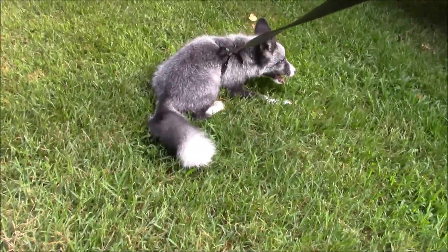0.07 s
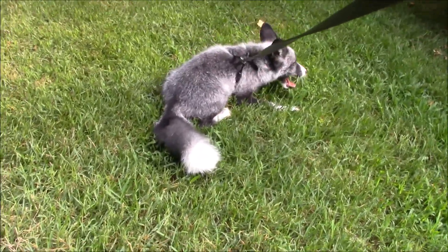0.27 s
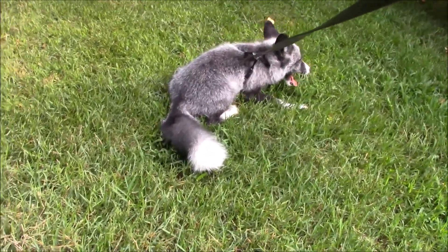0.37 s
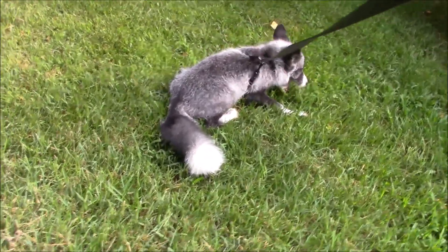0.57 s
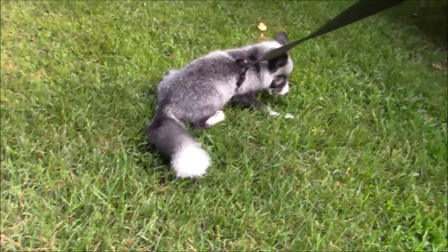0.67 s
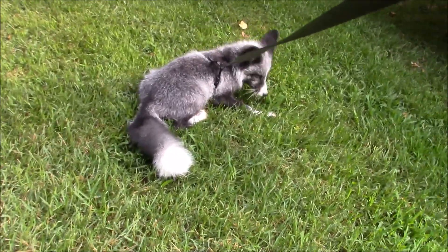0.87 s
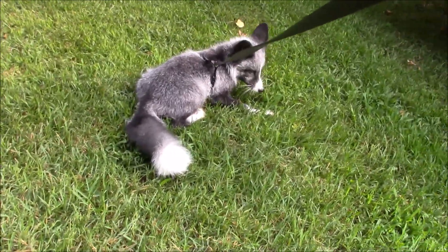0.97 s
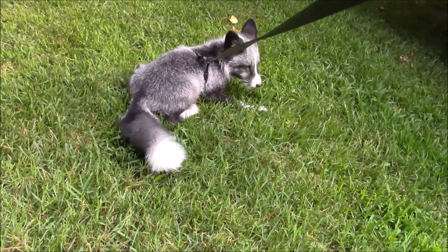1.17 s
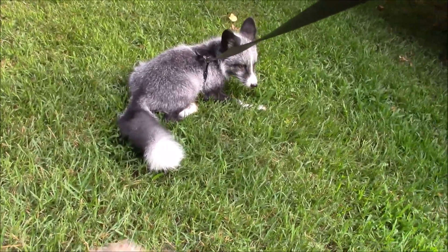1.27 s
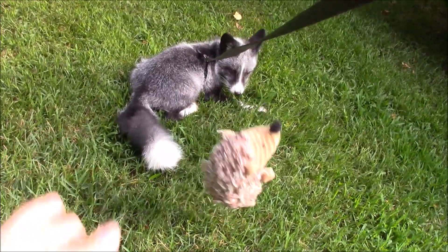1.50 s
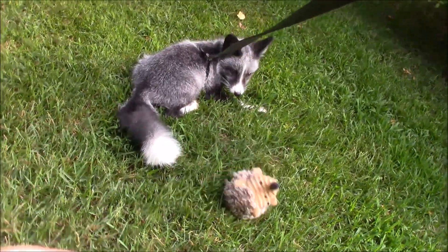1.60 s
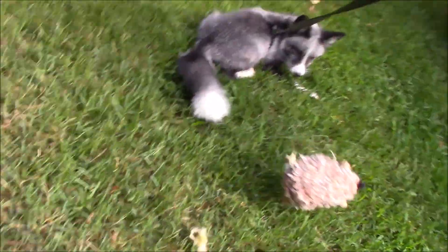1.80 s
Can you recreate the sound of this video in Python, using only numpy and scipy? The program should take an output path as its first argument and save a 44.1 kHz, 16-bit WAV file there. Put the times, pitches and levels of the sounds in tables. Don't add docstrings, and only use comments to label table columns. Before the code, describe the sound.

A squeaky toy, very close, outdoors. A dull brush at 0 s and a faint tick precede nine quick, loud, reedy squeaks from 0.23 to 1.1 s, each arching up and down in pitch, with small bulb ticks between. A softer, flatter, longer squeak follows at 1.17-1.27 s, then a faint whistling air sigh until 1.46 s, a dry snap at 1.43 s, and slight rustles near 1.65 s over low distant traffic.

```python
import sys
import numpy as np
from scipy import signal
from scipy.io import wavfile
from scipy.ndimage import uniform_filter1d

SR = 44100
rng = np.random.default_rng(int(sys.argv[2]) if len(sys.argv) > 2 else 0)


def gain_from_db(level_db):
    decades = np.asarray(level_db, float) / 20
    return 10 ** decades


def wav_out(sig):
    wavfile.write(sys.argv[1], SR, np.round(np.clip(np.atleast_2d(sig).T, -1, 1) * 32767).astype(np.int16))


N = 81585

# time in seconds, pitch in Hz, level in dB.
FIRST_STROKES = [
    [(0.2295, 1113, -10), (0.236, 1191, -7.5), (0.2479, 1277, -9), (0.2574, 1279, -9), (0.2804, 1165, -9.5),
     (0.2923, 1076, -11), (0.2993, 1024, -26), (0.3008, 976, -21.5)],
    [(0.3435, 1099, -13), (0.3564, 1157, -7), (0.3694, 1374, -11), (0.3774, 1322, -9.5),
     (0.3854, 1148, -7.5), (0.3909, 1104, -11), (0.3998, 1112, -9), (0.4083, 923, -26)],
    [(0.465, 1150, -8.5), (0.472, 1250, -7.5), (0.4809, 1334, -6.5), (0.4929, 1368, -7), (0.5044, 1313, -9),
     (0.5154, 1204, -8), (0.5213, 1050, -20.5), (0.5258, 1000, -23.5)],
    [(0.576, 1115, -16), (0.5795, 1070, -14.5), (0.5939, 1200, -6), (0.6019, 1342, -9),
     (0.6064, 1327, -7.5), (0.6159, 1075, -10.5), (0.6234, 1010, -22.5), (0.6288, 903, -23.5)],
]
MIDDLE_STROKES = [
    [(0.66, 1103, -12.5), (0.669, 1196, -8), (0.6849, 1408, -6), (0.6949, 1430, -6), (0.7029, 1408, -7),
     (0.7084, 1160, -12), (0.7139, 1066, -22.5), (0.7173, 1048, -17.5)],
    [(0.7755, 1109, -17.5), (0.789, 1200, -9.5), (0.7939, 1389, -5.5), (0.8019, 1381, -7.5),
     (0.8074, 1296, -7.5), (0.8119, 1077, -13.5), (0.82, 1026, -23), (0.8269, 859, -25.5)],
    [(0.8565, 1108, -13.5), (0.8724, 1282, -8.5), (0.8834, 1379, -3.5), (0.8919, 1392, -8.5),
     (0.8959, 1335, -7.5), (0.8995, 1160, -9.5), (0.9030, 1056, -23.5), (0.9060, 1054, -25),
     (0.9095, 1008, -26)],
    [(0.9665, 1130, -17.5), (0.9785, 1224, -10), (0.9829, 1407, -5.5), (0.9939, 1404, -7),
     (0.9999, 1332, -8.5), (1.0039, 1128, -15.5), (1.014, 1050, -15), (1.0204, 887, -26.5)],
]
LAST_STROKES = [
    [(1.0455, 1097, -16), (1.054, 1201, -13), (1.0674, 1423, -4), (1.0749, 1473, -5), (1.0814, 1482, -5),
     (1.0844, 1346, -6.5), (1.0885, 1097, -19.5), (1.0974, 1020, -22)],
    [(1.1705, 1044, -19.5), (1.1745, 1070, -17), (1.1849, 1079, -14.5), (1.2074, 1075, -14.5),
     (1.2380, 1046, -14), (1.2500, 1044, -17), (1.2580, 1082, -14.5), (1.2663, 944, -24),
     (1.2688, 880, -28.5)],
]
# one reflection notch in Hz, notch spacing in Hz,
# reflection share from 0 to 1, overtone level in dB, overtone change in dB per octave of pitch.
HAND_GRIPS = [(6030, 1230, 0.31, -7.5, 9), (5000, 885, 0.43, -8.5, 1.5), (5030, 1344, 0.5, -7.5, 3.5),
              (6380, 956, 0.64, -10, -9.5), (4872, 1070, 0.71, -8.5, -10.5), (5480, 1345, 0.75, -8, 4),
              (5427, 1176, 0.94, -7, -14), (5577, 1364, 0.81, -8, 11), (6010, 1341, 1, -8, -17.5),
              (5900, 4770, 0.57, -6, -1.5)]
# Hz, level in dB.
SQUEEZE_COLOUR = [(1800, 10), (2700, 1), (3800, -3), (5500, -5), (6800, -12), (8200, -34.5), (11000, -47.5),
                  (16000, -46)]
RELEASE_COLOUR = [(1800, 4), (2700, 2), (3600, -10), (5800, -11.5), (6900, -23.5), (8500, -33.5),
                  (11000, -37.5), (16000, -48)]
OPEN_HAND_COLOUR = [(1800, 4.5), (3200, -9.5), (5400, -7.5), (6500, -22.5), (8000, -24), (10500, -13.5),
                    (12500, -38.5), (16000, -50)]
# time in seconds, peak level in dB, pitch in Hz.
BULB_TICKS = [
    (0.0774, -29.5, 3440),
    (0.317, -22, 1600),
    (.399, -26.5, 590),
    (.562, -37, 1510),
    (.769, -19, 1390),
    (0.959, -21, 1500),
    (1.1614, -19, 1400),
]
# time in seconds, level in dB.
DRY_SNAPS = [
    (1.430, -30),
]
# time in seconds, level in dB, rise in seconds, fall in seconds,
# low edge in Hz.
BRUSHES = [
    (0.0, -37.5, .001, 0.02, 566),
    (.12, -61, 0.39, 0.71, 4330),
    (1.635, -54, 0.01, 0.017, 5000),
    (1.685, -62.5, 0.015, .015, 5900),
    (1.83, -81, .01, 0.0098, 2300),
    (0.0, -47.5, .001, 0.025, 3600),
    (0.0, -31, .001, 0.0064, 300),
    (1.259, -41, .009, .007, 5200),
    (1.275, -66, .01, 0.034, 5000),
]
BRUSH_TOPS_HZ = [3460, 13900, 9900, 10900, 7000, 16100, 2380, 14000, 12300]
# Hz, level in dB per Hz.
TRAFFIC_COLOUR = [(30, -30), (60, -11), (100, 3.5), (300, -8.5), (900, -4), (1900, -15), (3200, -24.5),
                  (16000, -34.5)]
# Hz, likeness from 0 to 1.
LEFT_RIGHT_LIKENESS = [(60, 1), (140, .99), (300, 0.92), (950, 0.99), (3770, .87), (15000, 0.79)]
# pitch in Hz, level in dB.
ENGINE_TONES = [
    (141, -58.5),
    (211, -59.5),
]

HAND_OPENS_S = 1.13


def at_hz(points, hz):
    table_hz, values = np.transpose(points)
    return np.interp(np.log(hz), np.log(table_hz), values)


def rms_one(x):
    return x / np.sqrt(np.mean(x ** 2) + 1e-20)


def drift(rate):
    knots_per_s = 400
    knots = rng.standard_normal(int(N / SR * knots_per_s) + 400)
    r = np.exp(-2 * np.pi * rate / knots_per_s)
    slow = rms_one(signal.lfilter([1], [1, -2 * r, r * r], knots)[390:])
    return np.interp(np.arange(N) / SR * knots_per_s, np.arange(len(slow)), slow)


def band(x, low_hz, high_hz, order=2):
    edges = [low_hz, min(high_hz, .45 * SR)]
    return signal.sosfilt(signal.butter(order, edges, "band", fs=SR, output="sos"), x)


def reed(count=17):
    out, flow = np.zeros((2, N)), np.zeros(N)
    wobble = np.array([drift(45) for _ in range(count)])
    strokes = FIRST_STROKES + MIDDLE_STROKES + LAST_STROKES
    k = np.arange(1, count + 1)[:, None]
    for n, (rows, grip) in enumerate(zip(strokes, HAND_GRIPS)):
        s, hz, db = np.transpose(rows)
        notch_hz, step_hz, share, over_db, slope_db = grip
        last = n == len(strokes) - 1
        colour = OPEN_HAND_COLOUR if last else RELEASE_COLOUR if n % 2 else SQUEEZE_COLOUR
        i = np.arange(int((s[0] - .006) * SR), int((s[-1] + .012) * SR))
        t = i / SR

        early_ms = 1000 * np.clip(s[0] - t, 0, None)
        late_ms = 1000 * np.clip(t - s[-1], 0, None)
        stop_db_per_ms = (4.5, 4.1, 8)[n % 2 + last]
        stop_hz_per_ms = (25, 37, 15)[n % 2 + last]
        f0 = uniform_filter1d(np.interp(t, s, hz), size=110)
        f0 = f0 - 113.4 * early_ms - stop_hz_per_ms * late_ms
        level_db = uniform_filter1d(np.interp(t, s, db), size=170)
        level_db = level_db - 10 * early_ms - stop_db_per_ms * late_ms
        gain = gain_from_db(uniform_filter1d(level_db, size=50))

        f = k * f0
        near = 1 / (1 + (f / 9800) ** 4)
        pressure_db = slope_db * near * np.log2(f0 / 1250)
        wobble_db = .5 * wobble[:, i] * np.log(k) * (2.0 + 2 * (1.5 - near))
        size = gain_from_db(at_hz(colour, f) + over_db + pressure_db + wobble_db)
        opening = last * (t - t.mean()) / (t[-1] - t[0])
        size = size * gain_from_db(21 * opening * (1.0 - near))
        size = size * (gain / gain.max() + 0.034) ** (-0.92 * (1 - near) * (not last))
        size[0] = 1

        glide = 1 - 0.45 * opening
        echo = np.clip(share, 0, .98) / (1 + (1540 / f) ** 4)
        reflection = echo * np.exp(-2j * np.pi * (f - notch_hz * glide) / step_hz)
        wave = size * (1 - reflection) * (f < .36 * SR)
        wave = wave * gain * np.sqrt(2 / np.sum(abs(wave) ** 2, axis=0))
        wave = wave * (-1) ** n

        phase = 2 * np.pi * np.cumsum(f0) / SR
        turns = np.exp(1j * (k * phase - 1.21 * (k - 1)))
        reach = f / (1 + (f / 10500) ** 6)
        for c, side in enumerate((.5, -.5)):
            louder = gain_from_db(side * (0.12 + 1.6 * reach / 6000))
            lead = np.exp(2j * np.pi * side * reach * 0.47 / SR)
            out[c, i] += np.real(np.sum(wave * louder * lead * turns, axis=0))
        flow[i] = gain
    return out, flow


def air(flow):
    noise, t = rng.standard_normal((3, N)), np.arange(N) / SR
    calm = gain_from_db(-11 * (t > HAND_OPENS_S))
    hiss = rms_one(band(noise[0] + 0.245 * noise[1] * [[1], [-1]], 830, 7000))
    hiss = gain_from_db(-50) * flow ** 1.25 / 0.12 * hiss * calm
    fizz = rms_one(band(noise[1] + 0.18 * noise[2] * [[1], [-1]], 7000, 13500, order=1))
    fizz = gain_from_db(-54) * np.sqrt(flow / 0.89) * fizz * gain_from_db(1.2 * drift(90)) * calm
    rattle_s, rattle_length_s, rattle_hz = .26, .016, 5950
    buzz = np.exp(-((t - rattle_s) / rattle_length_s) ** 4)
    buzz = gain_from_db(-29) * buzz * rms_one(band(noise[2], rattle_hz - 400, rattle_hz + 400))
    push = gain_from_db(-49.5) * band(flow ** 4 / 0.028, 12, 29.2, order=1)
    return hiss + fizz + buzz + push * gain_from_db([[1.5], [-1.5]])


def ring(s, db, hz, t60):
    t = np.clip(np.arange(N) / SR - s, 0, None)
    return gain_from_db(db - 60 * t / t60) * np.sin(2 * np.pi * hz * t)


def ticks():
    out = np.zeros(N)
    for s, db, hz in BULB_TICKS:
        t60 = 7 / hz
        out = out + ring(s, db, hz, t60) + ring(s, db - 39, 1.96 * hz, t60)
    snap_parts = [(6950, -1.0), (8300, -7), (9450, -20), (4750, -9), (3140, -5), (1800, 0)]   # Hz, dB
    for s, db in DRY_SNAPS:
        snap = sum(ring(s, db + part_db, hz, .003) for hz, part_db in snap_parts)
        out = out + band(snap, 700, 9500)
    return out


def sigh():
    start_s, length_s, from_hz, to_hz = 1.29, .17, 3150, 3750
    u = np.clip((np.arange(N) / SR - start_s) / length_s, 0, 1)
    hz = from_hz + (to_hz - from_hz) * u
    shape = np.sqrt(np.sin(np.pi * u) + 1e-9) * (u < 1)
    return gain_from_db(-58.5) * shape * drift(115) * np.sin(2 * np.pi * np.cumsum(hz) / SR)


def rustles():
    t, out = np.arange(N) / SR, 0
    for (s, db, rise, fall, low_hz), top_hz in zip(BRUSHES, BRUSH_TOPS_HZ):
        grain = rng.standard_normal((2, N)) * gain_from_db(2.5 * drift(160))
        shape = np.exp(np.minimum((t - s) / rise, (s - t) / fall))
        brush = rms_one(band(grain[0] + 0.049 * grain[1] * [[1], [-1]], low_hz, top_hz))
        out = out + gain_from_db(db) * shape * brush
    return out


def garden(x):
    t = np.arange(SR) / SR
    x = x * gain_from_db(-4 * (np.arange(N) > HAND_OPENS_S * SR))
    noise = rng.standard_normal((2, SR))
    tail = noise[0] + .5 * noise[1] * [[1], [-1]]
    tail = tail * gain_from_db(-60 * t / 0.82) * (t > .012)
    tail = band(band(tail, 2300, 8500, order=1), 100, 8500)
    tail = tail / np.sqrt(np.sum(tail ** 2) / 2)
    return gain_from_db(-32.5) * signal.fftconvolve(x[None], tail, axes=1)[:, :N]


def traffic():
    out, edges = 0, 22 * 2 ** np.arange(0, 9.6, .5)
    white = rng.standard_normal((2, 2, N + SR // 2))
    for k, (low, high) in enumerate(zip(edges, edges[1:])):
        mid, side = band(white[k % 2], low, high)[:, -N:]
        hz = np.sqrt(low * high)
        alike = np.clip(at_hz(LEFT_RIGHT_LIKENESS, hz), 0, 1)
        stereo = np.sqrt(1 + alike) * mid + np.sqrt(1 - alike) * side * [[1], [-1]]
        out = out + gain_from_db(at_hz(TRAFFIC_COLOUR, hz) - 0.5 * drift(30)) * stereo
    return gain_from_db(-45) * rms_one(band(out, 10, 9000))


def hum():
    t, out = np.arange(N) / SR, 0
    for hz, db in ENGINE_TONES:
        level = gain_from_db(db - 0.5 + 5.7 * drift(4.8))
        out = out + level * np.sin(2 * np.pi * hz * t + 1.1 * drift(0.8))
    return out


def scene():
    toy, flow = reed()
    small_noises = air(flow) + ticks() + sigh() + rustles()
    return toy + small_noises + garden(toy.mean(axis=0)) + traffic() + hum()


def top_cut(x):
    return signal.sosfilt(signal.butter(12, 15200, fs=SR, output="sos"), x)


def record(dry):
    top = 1.5
    return top_cut(top * np.tanh(dry / top))


dry = scene()
out = record(dry)
wav_out(out)
```